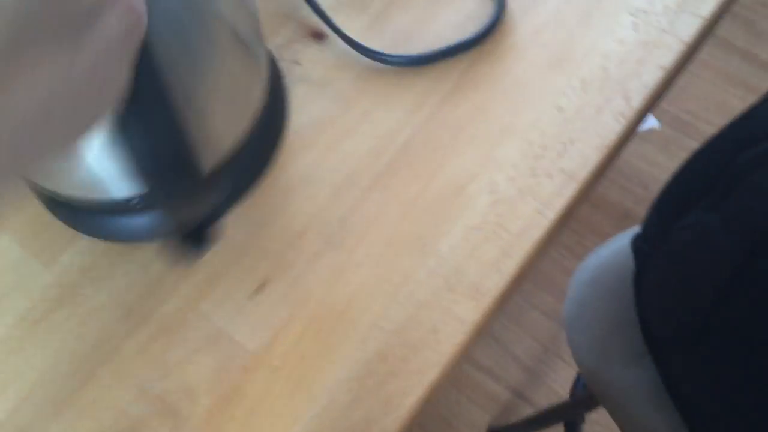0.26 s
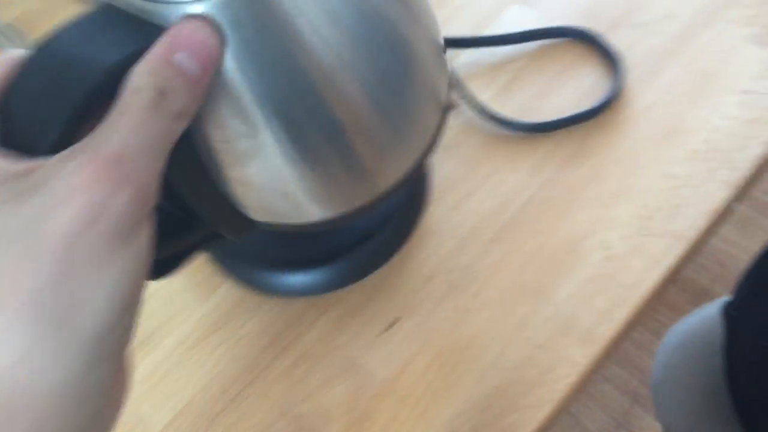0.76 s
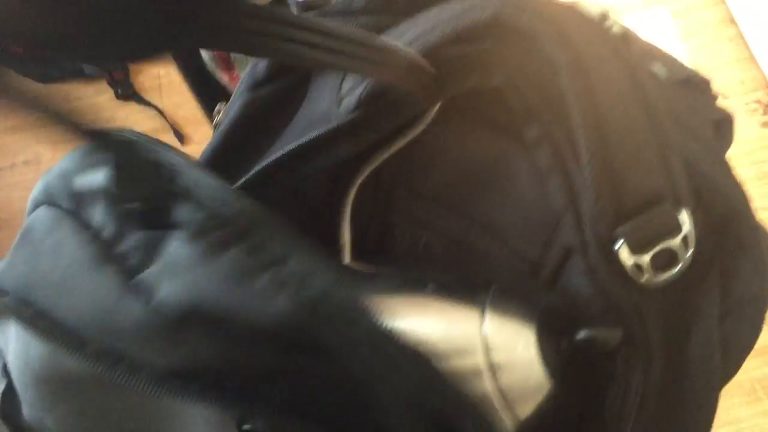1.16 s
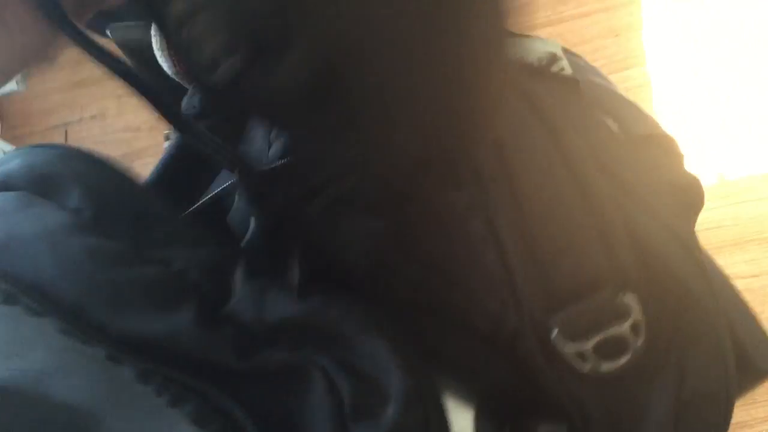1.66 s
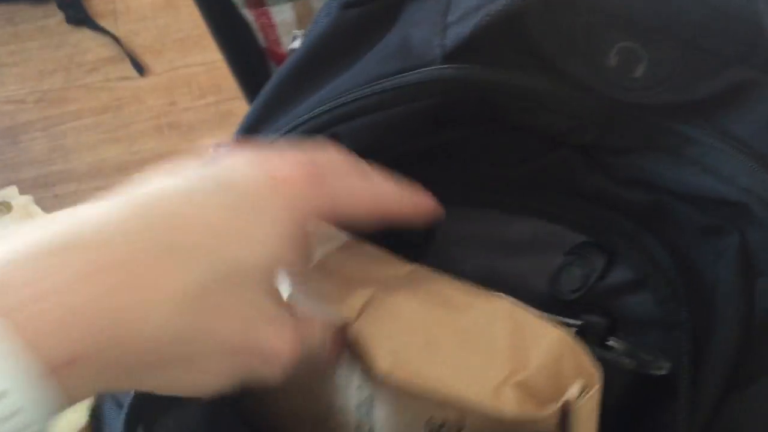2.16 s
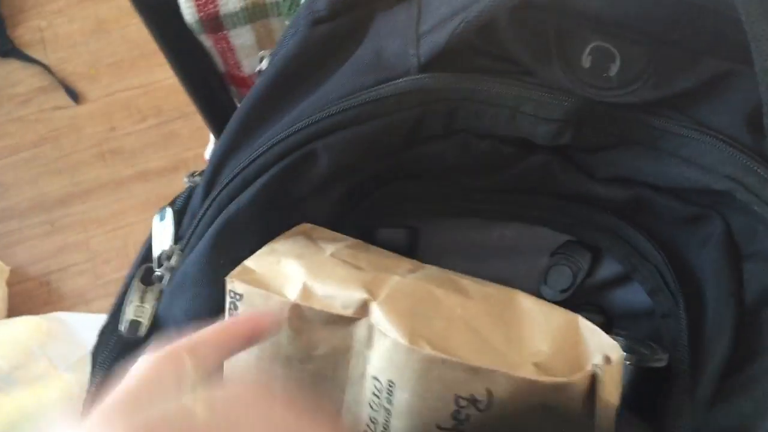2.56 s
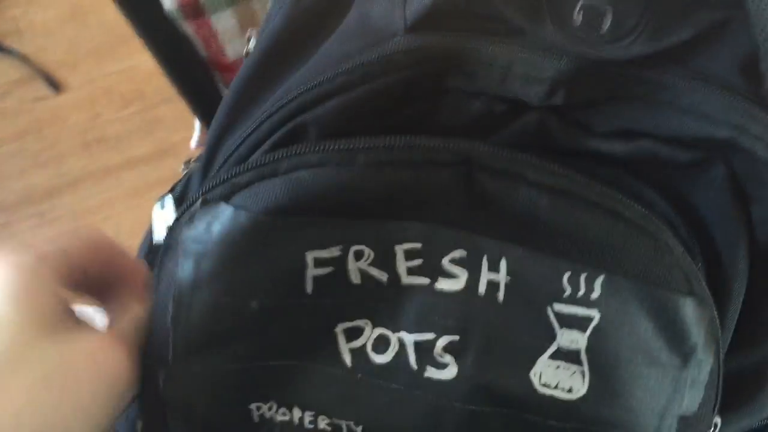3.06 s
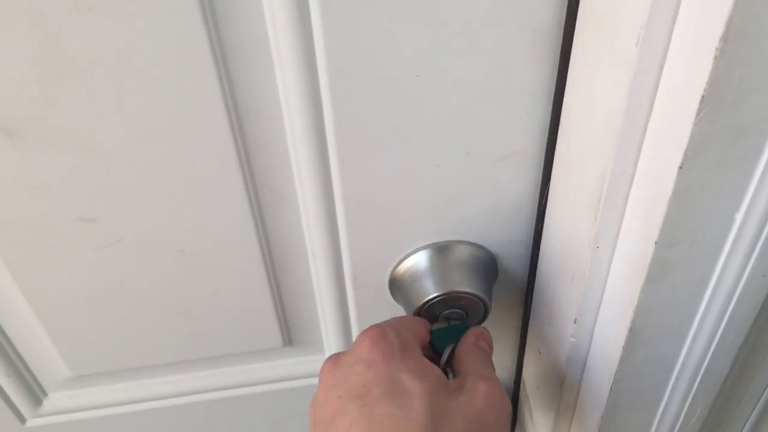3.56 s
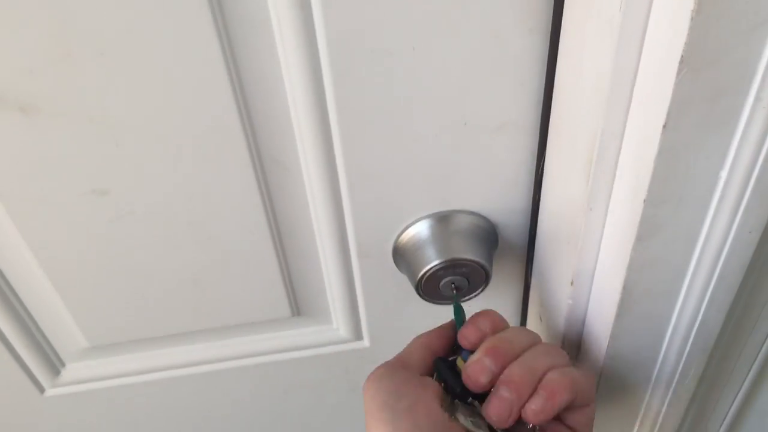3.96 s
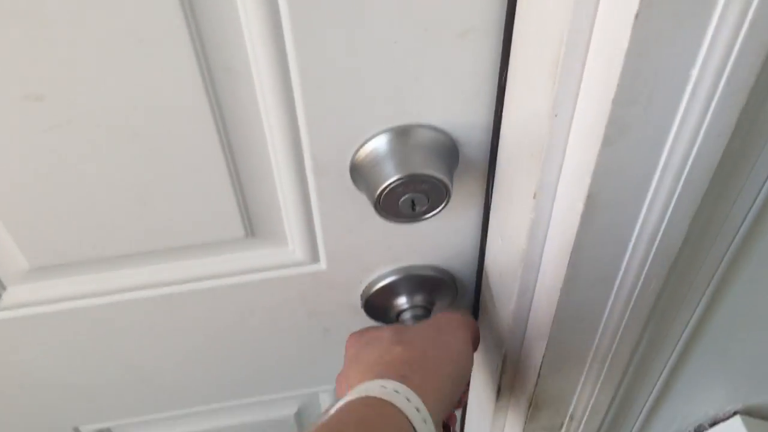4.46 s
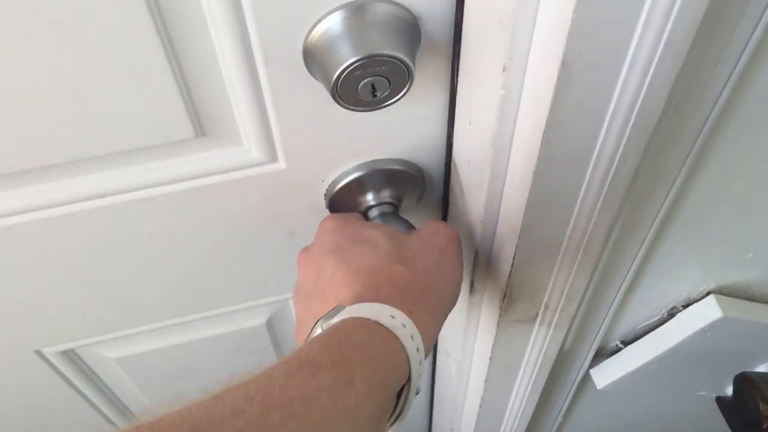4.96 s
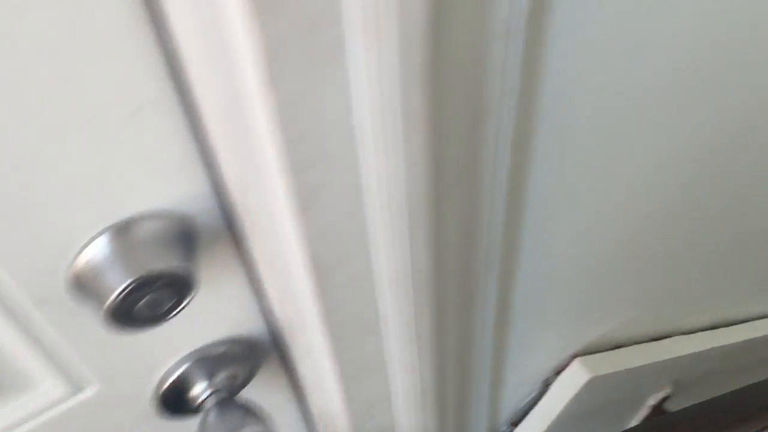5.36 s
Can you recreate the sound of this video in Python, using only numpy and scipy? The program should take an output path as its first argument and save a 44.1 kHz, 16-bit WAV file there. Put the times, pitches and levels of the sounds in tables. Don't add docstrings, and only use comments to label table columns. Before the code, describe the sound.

First hollow metallic knocks as a kettle is lifted from its base, then dry scrunching of bag fabric and paper with bright zipper ticks, in a lightly echoing room. The sound cuts to a drier porch: bolt snapping home, sharp lock clicks, a small key jingle, dull knob knocks against the door, and a last clink. Close hand-held microphone with low handling bumps and faint air.

```python
import sys
import numpy as np
from scipy import signal
from scipy.fft import rfft, irfft, next_fast_len
from scipy.io import wavfile
from scipy.ndimage import uniform_filter1d

SR = 44100
rng = np.random.default_rng(int(sys.argv[2]) if len(sys.argv) > 2 else 0)


def nominal_scale(level):
    x = np.asarray(level, float) / 20
    return 10 ** x


def inscribe(sig):
    pcm = np.round(np.clip(np.atleast_2d(sig).T, -1, 1) * 32767)
    wavfile.write(sys.argv[1], SR, pcm.astype(np.int16))


N = 247070


def evened(x):
    return x / np.sqrt(np.mean(x ** 2) + 1e-20)


def read(points, hz):
    f, value = np.transpose(points)
    return np.interp(np.log(hz + 1), np.log(f + 1), value)


def add(mix, s, sound):
    part = mix[round(s * SR):][:len(sound)]
    part += sound[:len(part)]


def coloured(x, tone):
    return irfft(rfft(x) * nominal_scale(read(tone, np.fft.rfftfreq(len(x), 1 / SR))), len(x))


def bands(x, edges_hz):
    hz = np.fft.rfftfreq(len(x), 1 / SR) + 1
    above_low, above_mid, above_high = (1 / (1 + (edge / hz) ** 6) for edge in edges_hz)
    masks = above_low * (1 - above_mid), above_mid * (1 - above_high), above_high
    return [evened(irfft(rfft(x) * mask, len(x))) for mask in masks]


def effort(t, start, length, db, change_db, attack_s, release, rest_db):
    since = t[:, None] - start
    drift_db = change_db * np.clip(since / length, 0, 1)
    held_db = db + drift_db - release * np.maximum(since - length, 0)
    power = (nominal_scale(held_db) * np.clip(since / attack_s, 0, 1)) ** 2
    return 10 * np.log10(power.sum(1) + nominal_scale(2 * rest_db))


# pitch in Hz, time to fall by 60 dB in seconds.
ECHO_TIMES = [(200, 0.38), (1000, 0.19), (4000, 0.17), (12000, 0.14)]


def room(x):
    echoes = np.zeros(SR // 2)
    at = np.arange(200, len(echoes) - 20, 20)
    echoes[at + rng.integers(0, 20, len(at))] = rng.choice([-1., 1.], len(at))
    hz, t, z = signal.stft(echoes, SR, nperseg=256)
    tail = signal.istft(z * nominal_scale(-60 * t / read(ECHO_TIMES, hz)[:, None]), SR, nperseg=256)[1]
    return signal.fftconvolve(x, tail / np.linalg.norm(tail))[:N]


def wavering_tones(rows):
    out = np.zeros(N)
    for s, length, hz, db in rows:
        waver = evened(uniform_filter1d(rng.standard_normal(round(length * SR)), 400))
        sine = np.sin(2 * np.pi * np.cumsum(hz * (1 + 0.0055 * waver)) / SR)
        level = np.sqrt(2) * nominal_scale(db + 1.2 * waver[::-1])
        add(out, s, level * sine * signal.windows.tukey(len(sine), .2))
    return out


# start in seconds, end in seconds, pitch in Hz, level in dB.
WHINES = [
    (.0, 1.302, 1180, -83),
    (1.872, 3.433, 2880, -76.5),
]


def appliance_whines():
    return wavering_tones([(start, end - start, hz, db) for start, end, hz, db in WHINES])


# start in seconds, length in seconds, deep level in dB, upper level over the deep one in dB.
THUMPS = [(0.063, 0.034, -49, 17.5), (0.31, 0.028, -34.5, 8.5), (0.488, 0.066, -37, 0.5),
          (0.795, 0.4, -81, 18.5), (1.31, 0.34, -73.5, 17), (1.95, 0.04, -52, 9), (2.55, 0.29, -58.5, 6),
          (3.282, 0.15, -67.5, 14), (3.825, 0.17, -50.5, 0), (3.947, 0.14, -43.5, 5), (4.36, 0.44, -54, -1),
          (4.616, 0.47, -49.5, 1.5), (4.963, 0.46, -55.5, -32)]
# pitch in Hz, width in Hz, level in dB.
THUMP_HUMS = [(53.6, 21, 9.5), (72.3, 21, 5.5), (143.1, 26, 11), (185.2, 4.2, 14), (272, 89, -2.5)]


def thumps():
    s, held, deep_db, upper_db = np.transpose(THUMPS)
    hz, slow = np.fft.rfftfreq(N, 1 / SR), np.arange(0, N + 256, 256) / SR
    deep = THUMP_HUMS[:2], deep_db, 83, -69.5
    upper = THUMP_HUMS[2:], deep_db + upper_db, 264, -68
    out = np.zeros(N)
    for hums, peak_db, release, rest_db in (deep, upper):
        shape = sum(nominal_scale(db) / (1 + (2 * (hz - f) / width) ** 2) for f, width, db in hums)
        shape = shape * (hz / (hz + 60)) ** 2
        level_db = effort(slow, s, held, peak_db, 0, 0.12, release, rest_db)
        hum = evened(irfft(rfft(rng.standard_normal(N)) * shape, N))
        out += hum * nominal_scale(np.interp(np.arange(N) / SR, slow, level_db))
    return out


SPLIT_HZ = (200, 800, 5000)


def rub(strokes, shot, end, tone, modes, grain_db, body_db):
    cut, air_mid_db, air_treble_db, air_bass_db, heavy_db, release = shot
    s, held, db, change_db, bright_db = np.transpose(strokes)
    length = round((end - cut) * SR)
    count = next_fast_len(length, True)
    t = cut + np.arange(count) / SR
    steps = np.arange(0, count + 64, 64)
    grains = rng.exponential(1, len(steps))
    grains = grains + 0.19 * evened(uniform_filter1d(rng.standard_normal(len(steps)), 12))
    grains = np.interp(np.arange(count), steps, np.minimum(grains, 4.2))
    noise = rng.standard_normal(count) * nominal_scale(grain_db * grains)
    z = signal.stft(noise, nperseg=256, noverlap=192)[2]
    patches = uniform_filter1d(rng.standard_normal(z.shape), 5, 0)
    patches = evened(uniform_filter1d(patches, 24, 1))
    noise = signal.istft(z * nominal_scale(2.2 * patches), nperseg=256, noverlap=192)[1][:count]
    hz = np.fft.rfftfreq(count, 1 / SR)
    body = sum(nominal_scale(body_db + .5 * db) / (1 + 1j * (hz - f) * t60 / 2.4) for f, db, t60 in modes)
    slow = cut + steps / SR
    bass = heavy_db, release, air_bass_db
    mid = 0, release, air_mid_db
    treble = bright_db, 1.6 * release, air_treble_db
    levels = []
    for over_db, fall, air_db in (bass, mid, treble):
        level_db = effort(slow, s, held, db + over_db, change_db, 0.013, fall, air_db)
        levels.append(np.interp(t, slow, level_db))
    contact = np.clip((levels[1] + 68) / 14, 0, 1)
    ringing = irfft(rfft(noise) * body, count)
    parts = bands(coloured(noise + contact * ringing, tone), SPLIT_HZ)
    return sum(p * nominal_scale(level_db) for p, level_db in zip(parts, levels))[:length]


# start in seconds, still air in dB for mid, treble and bass,
# bass of a stroke over its mid in dB, release in dB per second.
SHOTS = [
    (0, -72, -80, -74, 0, 85),
    (1.28, -58, -69, -60.5, -7, 401),
    (1.871, -74, -82, -66.5, -10.5, 267),
    (3.5, -72, -81, -80.5, -8.5, 452),
    (4.43, -68.5, -75.5, -77, 8, 254),
    (5.386, -71, -75, -64, -8, 248),
]
# start in seconds, length in seconds, pressure in dB,
# change over the stroke in dB, treble over mid in dB.
KETTLE_STROKES = [(0, 0.19, -55, -39.5, -5.5), (.066, 0.21, -38.5, -6.5, -15.5),
                  (.32, 0.11, -41.5, 1.5, -14.5), (.45, 0.073, -53, 14, -11.5), (.6, 0.12, -55.5, -3, -9),
                  (1.245, 0.046, -63.5, -2, -15)]
OPENING_STROKES = [(1.307, 0.039, -60, 12.7, -5.5), (1.39, 0.079, -56.5, 5.8, -1.5),
                   (1.514, 0.13, -50, 0.62, -3.5), (1.66, 0.071, -54.5, 0.5, -2),
                   (1.784, 0.072, -61, 4.1, 15.5)]
PACKING_STROKES = [(1.91, 0.054, -54, 19, 1.5), (1.958, .1, -37, 1, 0), (2.087, 0.23, -47, -12, -4),
                   (2.24, 0.065, -57.5, 8, 2.5), (2.359, 0.098, -63, -1, -3.5),
                   (2.584, 0.031, -50.5, -1.5, -0.5), (2.631, 0.029, -37.5, -2.5, 1),
                   (2.684, 0.37, -39, -27.5, -6.5), (3.123, 0.18, -51.5, -25.5, 0.5),
                   (3.292, 0.041, -61, 6, -5), (3.346, 0.16, -50, -22, -7.5)]
LOCK_STROKES = [(3.499, 0.028, -52.5, 13.5, 2), (3.54, 0.047, -48.5, 2, -11), (3.74, 0.083, -76.5, 21, -12),
                (3.915, 0.078, -57, 6, -12), (3.947, 0.041, -42, -4, -7.5),
                (4.019, 0.068, -44.5, -0.5, -0.5), (4.177, 0.26, -72, -23, 19.5)]
KNOB_STROKES = [(4.427, 0.087, -66.5, -7, -22), (4.56, 0.2, -62, 1.5, -7), (4.8, 0.052, -77.5, 27.5, -2),
                (4.95, 0.22, -60, -11, -15), (5.175, 0.041, -69.5, 0, 5), (5.254, 0.021, -71, -8, 19.5)]
LEAVING_STROKES = [(5.388, 0.181, -66, 9.5, -24), (5.389, 0.02, -49, -5, 0), (5.415, .12, -82, -11, 0)]
GRAIN_DB = [2.2, 1.5, 2.8, 3.1, 2, 0.8]
BODY_DB = [6, -12, -12, 9, -6, -20]


def rubbing_and_air():
    ends = [shot[0] for shot in SHOTS[1:]] + [N / SR]
    strokes = KETTLE_STROKES, OPENING_STROKES, PACKING_STROKES, LOCK_STROKES, KNOB_STROKES, LEAVING_STROKES
    colours = KETTLE_TONE, BAG_TONE, BAG_TONE, LOCK_TONE, BAG_TONE, BAG_TONE
    bodies = LIFTED_KETTLE, SACK, SACK, CYLINDER, KNOB, KNOB
    out = np.zeros(N)
    for settings in zip(strokes, SHOTS, ends, colours, bodies, GRAIN_DB, BODY_DB):
        cut = settings[1][0]
        add(out, cut, rub(*settings))
    return out


# start in seconds, length in seconds, pitch in Hz, level in dB.
SQUEAKS = [
    (1.808, 0.036, 4090, -53),
    (4.094, 0.0256, 4600, -42),
    (4.46, 0.042, 9400, -71),
    (5.22, 0.035, 5400, -84),
]


def squeaks():
    return wavering_tones(SQUEAKS)


def taps(rows):
    out = np.zeros(N)
    for s, db, hz, t60 in rows:
        t = np.arange(round(SR * max(t60, .003))) / SR
        pair = np.sin(2 * np.pi * hz * t) + nominal_scale(-9.5) * np.sin(2 * np.pi * 0.9 * hz * t)
        rise = np.minimum(t / (0.076 * t60 + 0.00029), 1)
        add(out, s, nominal_scale(db - 60 * t / max(t60, .003)) * rise * pair)
    return out


def ring(modes, contact_s, detune, spread_db=6.5):
    t = np.arange(max(2048, round(SR * max(m[2] for m in modes)))) / SR
    luck = rng.standard_normal((len(modes), 2))
    chatter = rng.standard_normal(2048) * nominal_scale(-60 * t[:2048] / max(contact_s, .004))
    chatter *= np.minimum(t[:2048] / (0.066 * contact_s), 1)
    x = 0
    for (hz, db, t60), (a, b) in zip(modes, luck):
        turn = np.exp(2j * np.pi * hz * (1 + detune * b) * t)
        drive = abs(chatter @ turn[:2048]) + 0.244 * np.linalg.norm(chatter)
        x = x + nominal_scale(db + spread_db * a - 60 * t / max(t60, .01)) * turn.imag / drive
    x = signal.oaconvolve(x, chatter)
    return x / abs(x).max()


def rattle(t60, tone, edges_hz, levels_db):
    t = np.arange(8192) / SR
    parts = bands(coloured(rng.standard_normal(len(t)), tone), edges_hz)
    rises_s, lasts = (.003, 0.00099, 0.00058), (1.8, 2.08, 0.84)
    out = 0
    for part, db, rise_s, last in zip(parts, levels_db, rises_s, lasts):
        crack = nominal_scale(-60 * t / (0.0022 * last))
        burst = 0.71 * nominal_scale(-60 * t / (max(t60, .004) * last))
        out = out + nominal_scale(db) * (crack + burst) * np.minimum(t / rise_s, 1) * part
    return out


def blows(hits, tone, modes, detune, free_s, contact, spread_db):
    out = np.zeros(N)
    for s, db, treble_db, bass_db, ring_db in hits:
        t60 = free_s * nominal_scale(0.33 * ring_db)
        add(out, s, nominal_scale(db - 11.0) * rattle(t60, tone, SPLIT_HZ, (bass_db, 0, treble_db)))
        add(out, s, nominal_scale(db + ring_db) * ring(modes, contact * t60, detune, spread_db))
    return signal.sosfilt(signal.butter(2, 70, "high", fs=SR, output="sos"), out)


# pitch in Hz, level in dB, time to fall by 60 dB in seconds.
KEY_RINGS = [(6650, -20, .03), (8296, -20, .03), (12940, -8, .028), (14300, -7, .028)]


def clinks(hits, free_s):
    out, flat = np.zeros(N), [(100, 0), (16000, 0.0045)]
    for s, db, hz, mid_db, ring_db in hits:
        t60 = free_s * nominal_scale(0.37 * ring_db)
        bunch = [(f, level_db, free * t60 / .025) for f, level_db, free in KEY_RINGS]
        modes = [(hz, 0, 0.83 * t60)] + bunch
        add(out, s, nominal_scale(db - 13.5) * rattle(t60, flat, (600, 1500, 5000), (mid_db - 48, mid_db, 0)))
        add(out, s, nominal_scale(db + ring_db) * ring(modes, 0.35 * t60, 0.0052, spread_db=0))
    return signal.sosfilt(signal.butter(2, 1800, "high", fs=SR, output="sos"), out)


# time in seconds, peak in dB.
TICKS = [(0.0677, -36), (0.3446, -37), (0.467, -13), (0.5487, -18), (2.796, -14), (4.5042, -22),
         (4.5346, -41), (4.6798, -42), (4.711, -17), (4.8274, -36), (4.8488, -13.5), (4.9571, -40),
         (5.1864, -50), (5.1961, -46), (5.264, -34)]


def ticks():
    out = np.zeros(N)
    s, db = np.transpose(TICKS)
    out[np.round(s * SR).astype(int)] = nominal_scale(db + 5)
    return signal.sosfilt(signal.butter(4, (5500, 15000), "band", fs=SR, output="sos"), out)


# time in seconds, mid peak in dB, then treble over mid,
# bass over mid and ring over mid, all in dB.
KETTLE_HITS = [(0.07, -10.5, -11.5, 9.5, -6.5), (0.182, -16.5, -18, 11, -15), (0.303, -14.5, -48, 4, -28),
               (0.327, -14.5, -9, -7, -8.5), (0.412, -18.5, -2.5, 10.5, -5), (0.452, -28.5, 2, -23, 5),
               (0.466, -17.5, -0.5, 11, -13.5), (0.476, -7, -32.5, -53, -33.5),
               (0.491, -16.5, -4, -58, -25), (0.514, -7.5, -17, -12, -20.5), (0.55, -21.5, 2, 13.5, -11.5),
               (0.692, -20, -11.5, -22, -20.5), (0.733, -20.5, -38, -32, -16.5)]
# time in seconds, peak in dB, pitch in Hz, time to fall by 60 dB in seconds.
KETTLE_TAPS = [(0.0716, -27.5, 4380, 0.023), (0.33, -32.5, 55.5, 0.12), (0.3306, -15, 370, 0.034),
               (0.3986, -23, 2240, 0.009), (0.4206, -13, 2070, 0.0076), (0.4522, -15.5, 825, 0.022),
               (0.466, -22.5, 910, 0.073), (0.54, -29, 58.6, 0.097), (0.549, -24.5, 1750, 0.022),
               (0.5525, -19, 868, 0.026), (0.6719, -38, 450, 0.085), (0.6912, -35, 904, 0.051),
               (0.7346, -45, 940, 0.25), (0.735, -48.5, 2094, 0.38), (0.692, -37, 1763, 0.14),
               (0.78, -52, 1865, 0.27)]
# pitch in Hz, level in dB per Hz.
KETTLE_TONE = [(88, -30.5), (150, 12), (265, -22.5), (434, 8), (560, -5.5), (2450, -10.5), (5070, -32.5),
               (16500, -52.5)]
# pitch in Hz, level in dB, time to fall by 60 dB in seconds.
SEATED_KETTLE = [(418, -9, .06), (448, 0, .36), (860, -14, .2), (1324, -12, .13), (1720, -7, .1),
                 (1790, -13, .12), (1980, -17, .2), (2223, -14, .1), (2405, -10, .27), (2826, -16, .06)]
LIFTED_KETTLE = [(420, -3, .22), (449, -6, .12), (916, -5, .25), (810, -10, .3), (1700, -9, .2),
                 (1830, -10, .25), (1930, -12, .35), (2137, -11, .2), (2490, -15, .2), (1572, -11, .25)]


def kettle():
    seated = blows(KETTLE_HITS[:2], KETTLE_TONE, SEATED_KETTLE, 0.003, .045, 0.4, 1.5)
    lifted = blows(KETTLE_HITS[2:], KETTLE_TONE, LIFTED_KETTLE, 0.006, 0.05, 0.5, 2.5)
    return seated + lifted + taps(KETTLE_TAPS)


# time in seconds, mid peak, treble, bass and ring over mid in dB.
BAG_HITS = [(1.297, -22, -11, -8, -18), (1.319, -18.5, -3, -20, -29), (1.392, -37, -14, 1, -1.5),
            (1.95, -15, -17, -28, -18), (1.968, -17, -3, -17, -18), (2.04, -13, -14, -42, -14.5),
            (2.054, -16.5, -10, -24, -14.5), (2.173, -20, -29, -22, -23), (2.261, -27, -18, 9, -13.5),
            (2.378, -47.5, 19, -19, -26), (2.43, -36, -24.5, -29, -10), (2.609, -26, 4, -26, -8.5),
            (2.7, -19, 5, 4, -14.5), (2.847, -18, -7, -2, -17.5), (2.87, -30.5, 4, 8.5, -6),
            (2.957, -30.5, -9, -7, -12), (3.127, -40.5, 17, 1, 2.5), (3.352, -45, -20, 6, -1)]
# time in seconds, treble peak in dB, strongest ring in Hz,
# mid over treble in dB, ring in dB.
PULL_CLINKS = [(1.5225, -11.5, 13400, -16, -20), (1.7884, -13, 9250, -39, -14),
               (2.795, -7, 15260, -23, -14), (3.056, -40, 14100, -33, -10), (3.1378, -22.5, 6650, -39, -6)]
# time in seconds, peak in dB, pitch in Hz, time to fall by 60
# dB in seconds.
BAG_TAPS = [(1.3182, -25, 2700, 0.009), (1.3384, -29.5, 2120, 0.023), (1.392, -39, 3080, 0.008),
            (1.6355, -32, 2350, 0.014), (1.655, -28.5, 2920, 0.0075), (1.6725, -37, 2080, 0.016),
            (1.7883, -37.5, 3600, 0.021), (1.8159, -44, 4040, 0.023), (1.83, -47, 572, 0.17),
            (1.949, -20.5, 1100, 0.014), (1.9785, -26, 1060, 0.013), (1.9797, -36, 248, 0.02),
                (2.0213, -36, 1360, 0.013), (2.0391, -27, 1140, 0.032), (2.0538, -17, 1250, 0.0083),
                (2.0727, -32, 980, 0.038), (2.2609, -25, 3280, 0.0052), (2.4281, -41.5, 1090, 0.014),
                (2.6465, -28, 2170, 0.0095), (2.6654, -18.5, 2460, 0.0046), (2.6972, -25, 1570, 0.012),
                (2.8479, -23.5, 630, 0.012), (2.8597, -24.5, 690, 0.0098), (2.8695, -25, 1470, 0.0093),
                (2.9029, -35.5, 740, 0.018), (2.958, -46, 3700, 0.0073), (3.1267, -38, 1203, 0.019),
                (3.327, -36, 254, 0.02), (3.3521, -35, 343, 0.049), (3.3762, -34, 280, 0.029),
                (3.3832, -29.5, 480, 0.01), (3.4027, -39, 206, 0.074), (3.4057, -44, 1960, 0.031)]
# pitch in Hz, level in dB per Hz.
BAG_TONE = [(88, -53), (150, -31), (183, 15.5), (231, 3.5), (798, -6.5), (1180, -6), (10500, -14.5),
            (16500, -16)]
# pitch in Hz, level in dB, time to fall by 60 dB in seconds.
SACK = [(210, 0, .08), (650, -3, .04), (1150, -7, .015), (2100, -7, .012)]


def bag():
    rummaging = blows(BAG_HITS, BAG_TONE, SACK, 0.178, 0.017, 0.92, 2.4)
    return rummaging + clinks(PULL_CLINKS, 0.029) + taps(BAG_TAPS)


# time in seconds, treble peak in dB, strongest ring
# in Hz, mid over treble in dB, ring in dB.
KEY_CLINKS = [(4.1948, -33, 5720, 1.5, -3), (4.2174, -34.5, 13000, 0, 5.5), (4.2239, -23.5, 13960, -12, -7),
              (4.2642, -33.5, 13800, 2, -11), (4.3075, -20, 8830, -17, -10), (4.34, -25, 14900, -16, -20),
              (5.333, -37.5, 5540, -8, -12), (5.4032, -27, 6760, -11, 2), (5.4135, -24.5, 8290, -20, 4)]
# time in seconds, peak
# in dB, pitch in Hz, time to fall by 60 dB in seconds.
JINGLE_TAPS = [(2.7938, -16.5, 5960, 0.004), (2.7937, -12, 14900, .006), (3.761, -48, 3080, .015),
               (3.994, -43, 9350, .01), (4.04, -19, 2940, .01), (4.082, -22, 2920, 0.013),
               (4.082, -23, 13100, 0.014), (4.297, -46, 12000, .005), (4.185, -42, 2500, 0.013),
               (4.311, -29.5, 4140, 0.0062), (4.34, -41, 4530, 0.015), (5.267, -44.5, 6200, 0.0086),
               (5.404, -32.5, 2500, 0.016), (5.415, -43, 2550, 0.023), (5.592, -44, 152, 0.06),
               (5.593, -36.5, 1370, 0.031)]


def keys():
    return clinks(KEY_CLINKS, 0.036) + taps(JINGLE_TAPS)


# time in seconds, mid peak, treble, bass and ring over mid in dB.
KNOB_HITS = [(4.497, -25.5, -6, -23, -35), (4.503, -28, 3, -0.5, -0.5), (4.559, -20, 2.5, 4, -33),
             (4.626, -31, 1, 4.5, -5), (4.694, -21.5, -7.5, -24, -8), (4.711, -28.5, 8, 1, -4),
             (4.732, -15.5, -6.5, -5, -40), (4.82, -30, -15, 13, -4), (4.852, -20, -3, -9, -18),
             (4.929, -48, 16.5, -6, -27), (4.952, -34.5, -6, -16, -11), (4.976, -27, -2, -25, -6.5),
             (4.988, -25.5, 4, -31, -8), (5.086, -26, -14, -39, -31), (5.122, -36, -10, -36, -0.5),
             (5.227, -33.5, -27, -39, -30), (5.59, -44.5, -28, 19.5, -31)]
# time in seconds, peak in dB, pitch in Hz, time to fall by 60 dB in seconds.
KNOB_TAPS = [(4.6316, -26.5, 3140, 0.013), (4.432, -44.5, 480, 0.051), (4.434, -47, 150, 0.074),
             (4.7, -28, 180, .08), (4.819, -30.5, 150, 0.1), (4.8211, -22.5, 397, .015),
             (4.85, -35, 259, 0.2), (4.8568, -24, 1450, 0.017), (4.8712, -32.5, 623, 0.052),
             (4.9594, -37.5, 594, 0.051), (5.0212, -32, 3320, 0.008), (5.0217, -39, 990, 0.039),
             (5.0854, -34, 1520, 0.014), (5.1346, -41, 622, 0.063), (5.1727, -35, 364, 0.019),
             (5.1741, -42.5, 3100, 0.01), (5.2268, -38.5, 3080, 0.018)]
# pitch in Hz, level in dB per Hz.
KNOB_TONE = [(88, -29), (150, -9), (3230, -19), (4870, -28), (6050, -28.5), (16500, -46.5)]
# pitch in Hz, level in dB, time to fall by 60 dB in seconds.
KNOB = [(195, 2, 0.26), (412, -1.5, 0.14), (625, 6.5, 0.086), (1417, 19, 0.0037), (3140, 13, 0.018)]


def knob():
    return blows(KNOB_HITS, KNOB_TONE, KNOB, 0.03, 0.1, 0.89, 3.5) + taps(KNOB_TAPS)


# time in seconds, mid peak, treble, bass and ring over mid in dB.
LOCK_HITS = [(3.509, -34.5, 7, -21, 7), (3.513, -28, 7, -24, -13), (3.525, -23, 3, -19, -14),
             (3.629, -26, -6, -6, -20), (3.668, -35.5, 3.5, 3, 1.5), (3.711, -44.5, 1, -25, 4),
             (3.735, -53, 10, -19, -3), (3.762, -57, -22, -18, 10.5), (3.789, -45.5, -2, -21, -3),
             (3.825, -31, -26, -32, -28), (3.835, -25.5, -7, -7.5, -2.5), (3.908, -29.5, -10, -3, -1),
             (3.957, -40, -23, -24, -17), (3.965, -32, -45, -24, 9.5), (4.023, -14.5, -5, -11, -0.5),
             (4.093, -19.5, 2.5, -36, -0.5)]
BOLT_HIT = [
    (3.5805, -13, 1, -24, -1.5),
]
# time in seconds, peak in dB, pitch in
# Hz, time to fall by 60 dB in seconds.
LOCK_TAPS = [(3.826, -29, 2930, .01), (3.909, -27.5, 3800, .008), (3.957, -30, 3180, .01),
             (3.705, -52, 956, 0.11), (3.71, -42.5, 287.3, 0.29), (3.5127, -29.5, 1490, 0.059),
             (3.5146, -21.5, 3360, 0.015), (3.5161, -25, 9700, 0.011), (3.5267, -23, 12900, 0.0087),
             (3.6313, -27, 4460, 0.013), (3.7103, -30, 4500, 0.0077), (3.836, -17, 3095, 0.0099),
             (3.9662, -14.5, 3050, 0.011), (3.9829, -28, 3190, 0.0073), (3.9937, -39, 14200, 0.008),
             (4.0235, -12.5, 3200, 0.0072), (4.0951, -27, 3250, 0.01)]
# pitch in Hz, level in dB per Hz.
LOCK_TONE = [(88, -44.5), (150, 27.5), (336, -4), (571, 2.5), (752, -15.5), (2200, -19), (4970, -33.5),
             (16500, -45)]
# pitch in Hz, level in dB, time to fall by 60 dB in seconds.
CYLINDER = [(1500, -16, .03), (2950, 0, .018), (3250, -1, .018), (4400, -14, .012)]
DOOR = [(285, -8, .5), (458, 3, .1), (576, 0, .08), (931, -4, .28), (1373, -3, .06), (1120, -11, .15),
        (1518, 4, .2), (2030, 0, .04), (8823, -22, .1), (12330, -28, .08)]


def lock():
    cylinder = blows(LOCK_HITS, LOCK_TONE, CYLINDER, 0.014, 0.053, 0.3, 3)
    bolt = blows(BOLT_HIT, LOCK_TONE, DOOR, 0, 0.066, 0.92, 0)
    return cylinder + bolt + taps(LOCK_TAPS)


def scene():
    kitchen = kettle() + bag()
    porch = lock() + knob() + keys() + ticks()
    echoes = room(nominal_scale(-8.0) * kitchen + nominal_scale(-12.0) * porch)
    background = appliance_whines() + thumps() + rubbing_and_air()
    return (background + squeaks() + kitchen + porch + echoes)[None]


def roll_off(x):
    return signal.sosfilt(signal.butter(12, 16650, fs=SR, output="sos"), x)


def record(dry):
    hiss = signal.lfilter([1], [1, -.4], rng.standard_normal(dry.shape))
    dry = dry + nominal_scale(-86) * hiss
    limited = signal.oaconvolve(dry, signal.firwin(255, 15900, fs=SR)[None], "same")
    return roll_off(limited)


dry = scene()
out = record(dry)
inscribe(out)
```